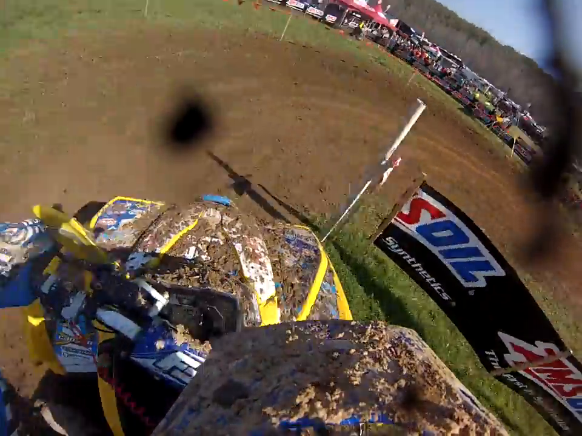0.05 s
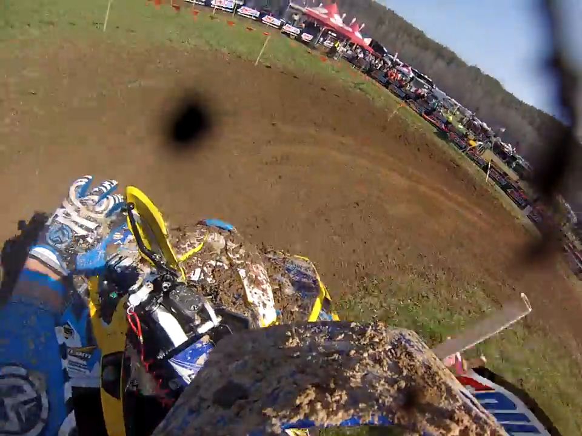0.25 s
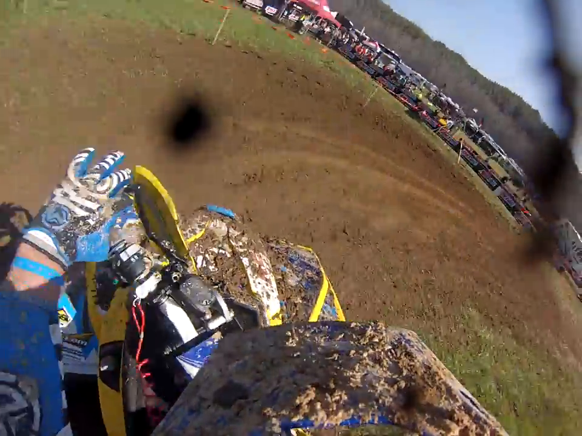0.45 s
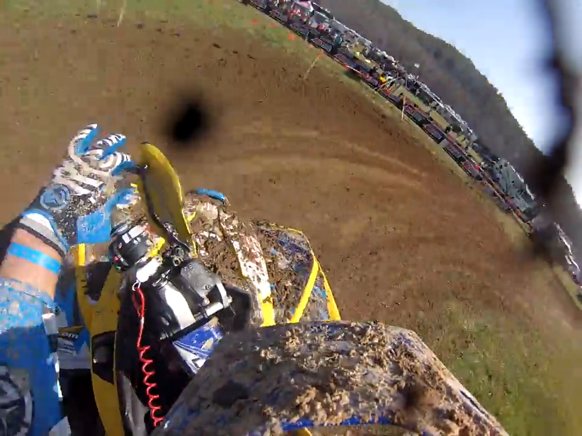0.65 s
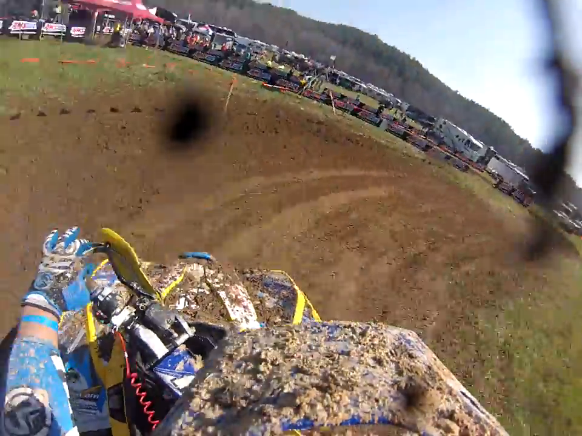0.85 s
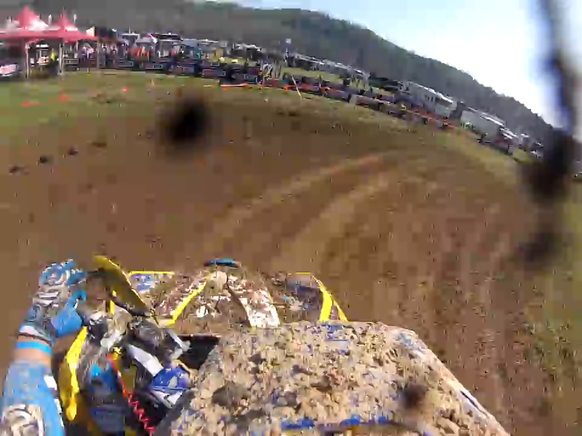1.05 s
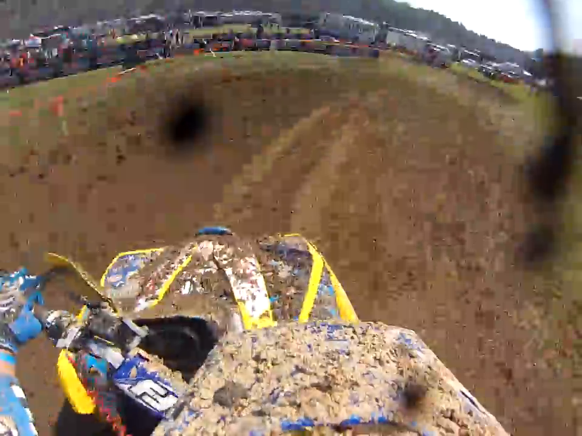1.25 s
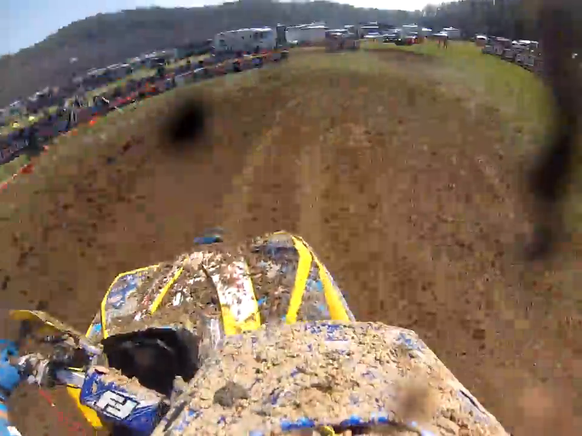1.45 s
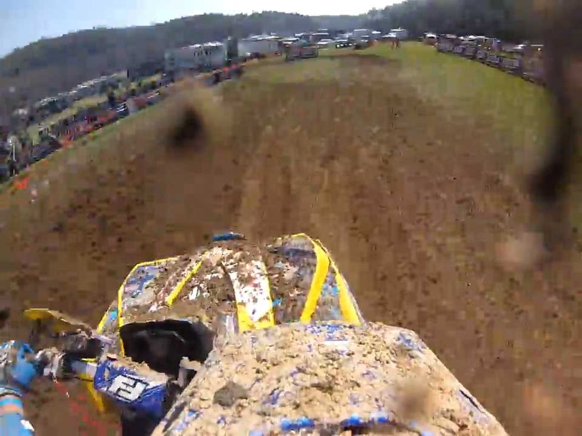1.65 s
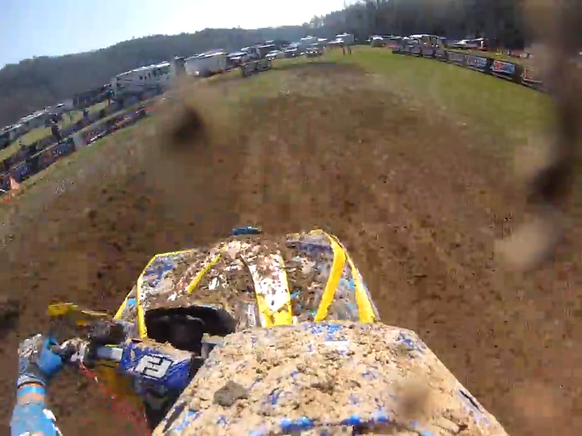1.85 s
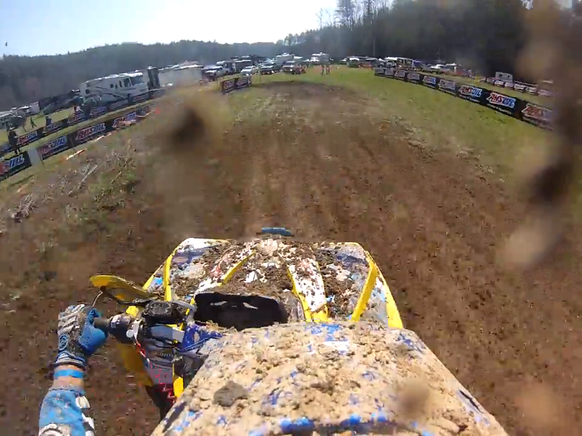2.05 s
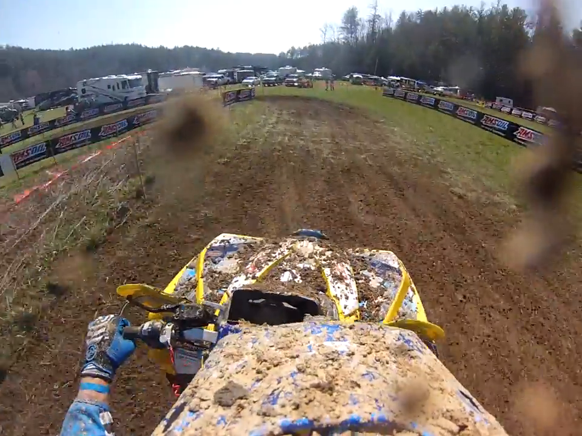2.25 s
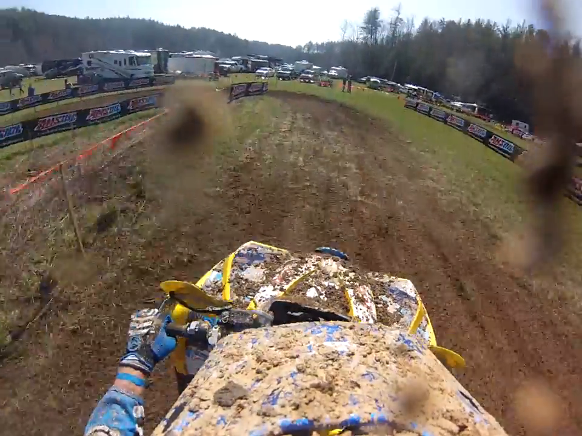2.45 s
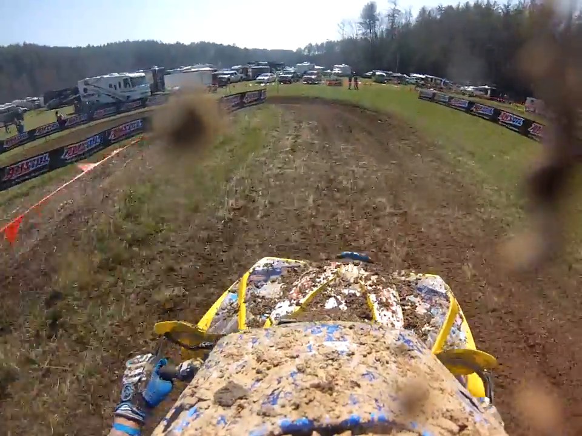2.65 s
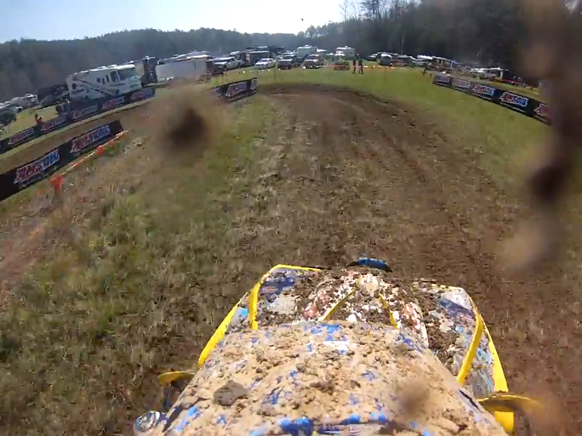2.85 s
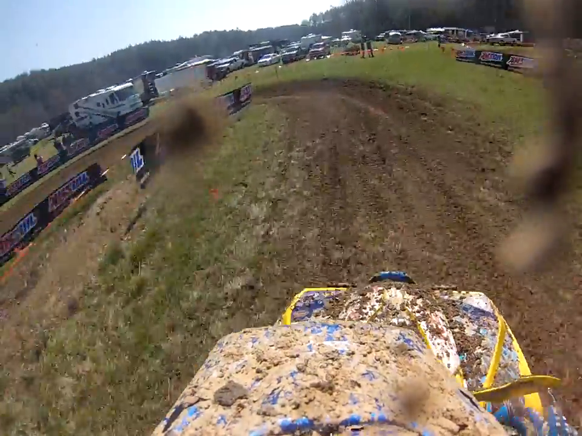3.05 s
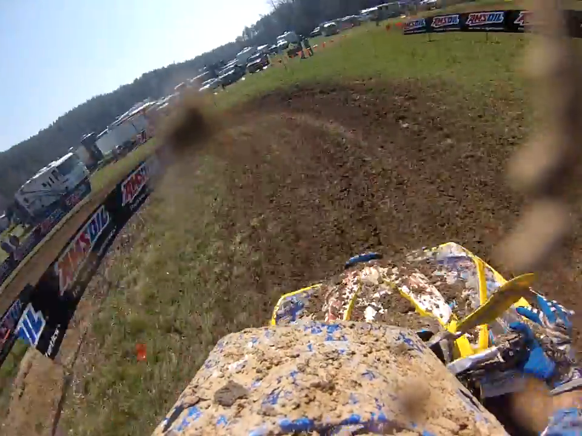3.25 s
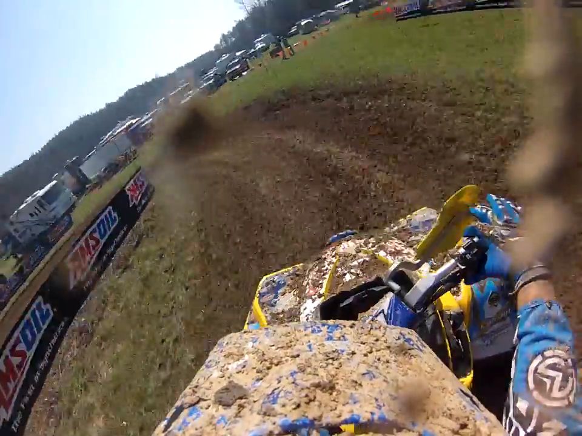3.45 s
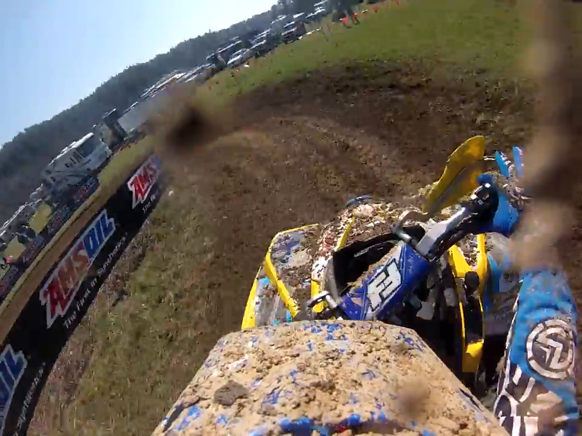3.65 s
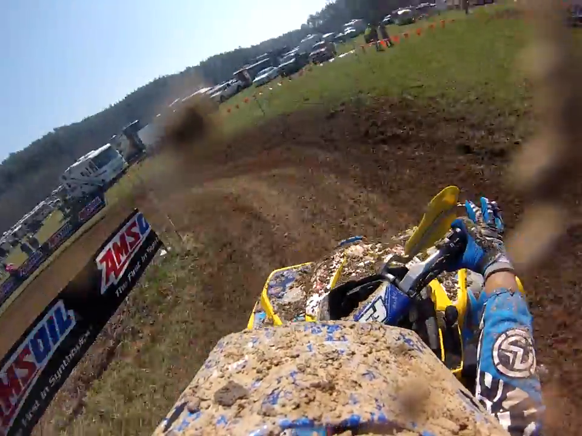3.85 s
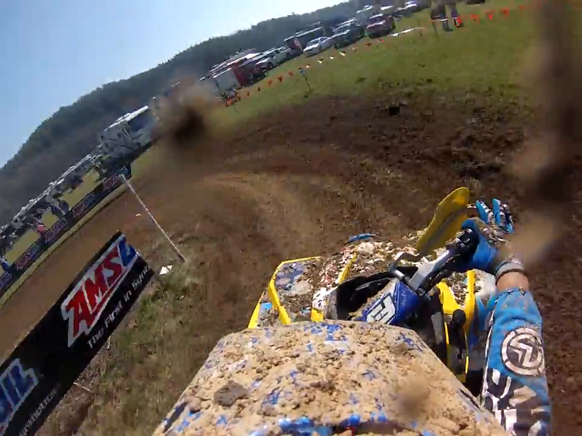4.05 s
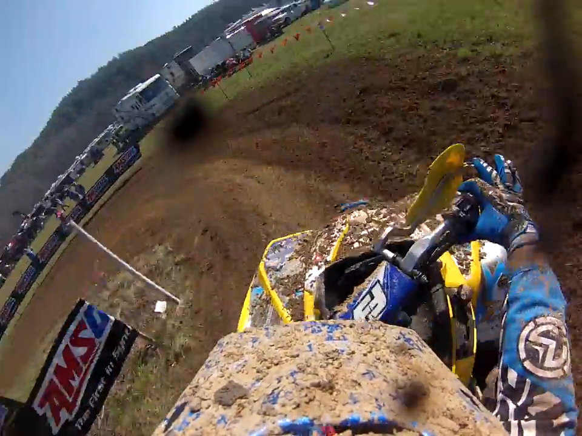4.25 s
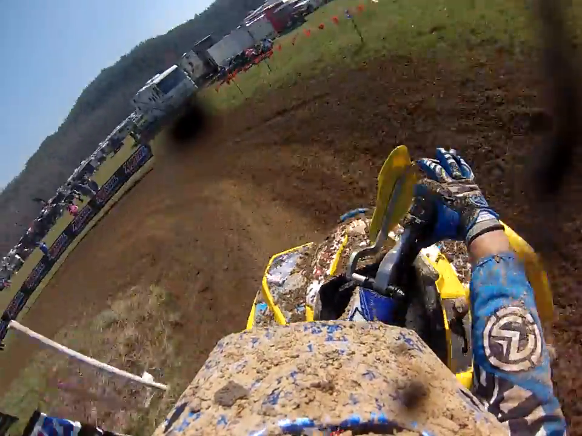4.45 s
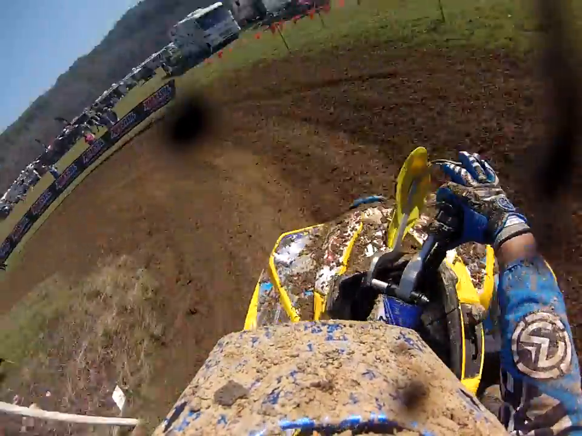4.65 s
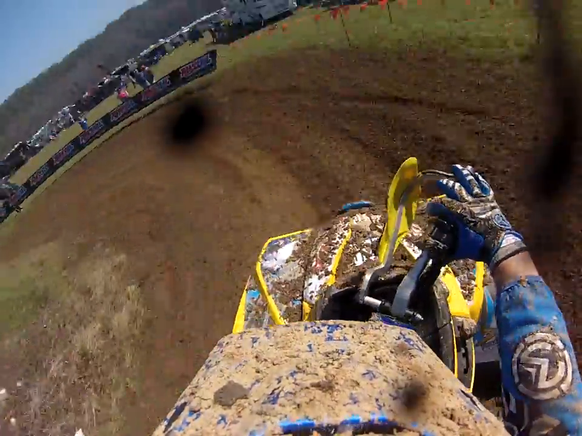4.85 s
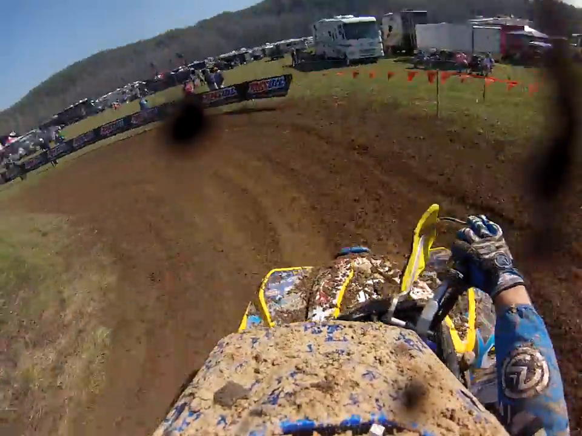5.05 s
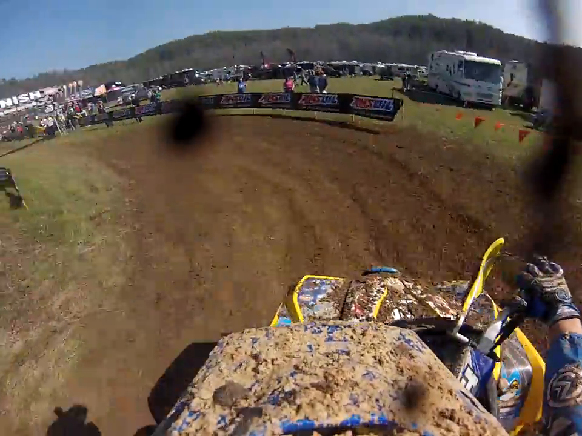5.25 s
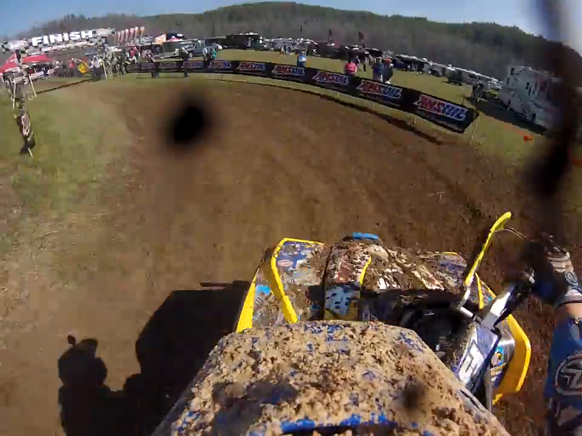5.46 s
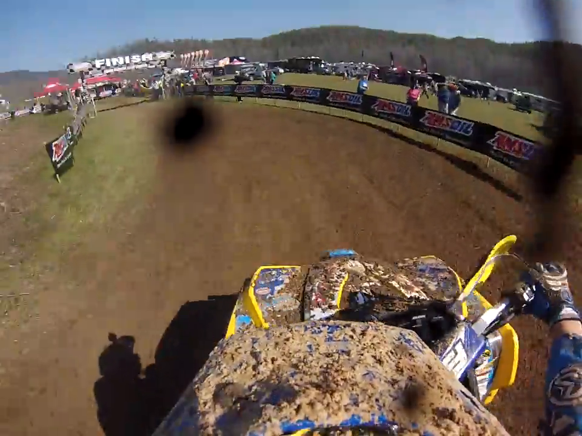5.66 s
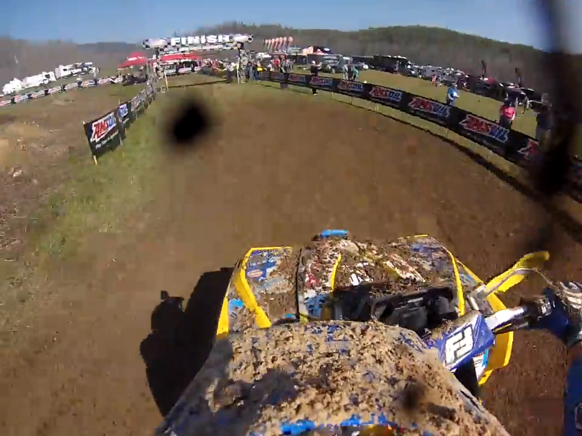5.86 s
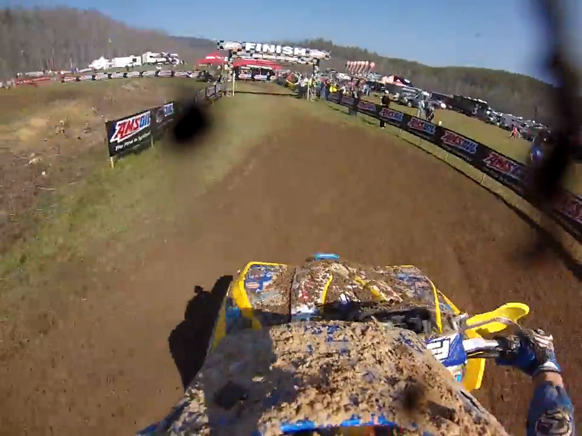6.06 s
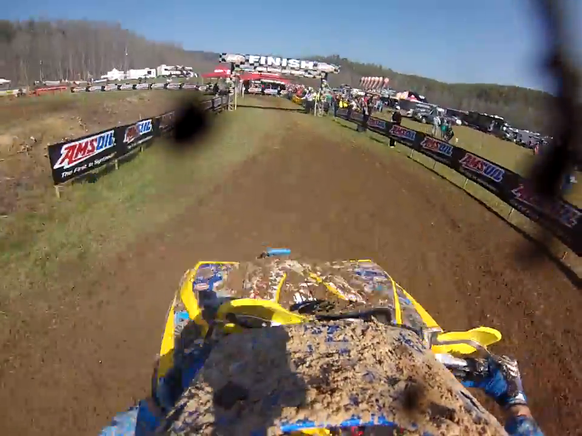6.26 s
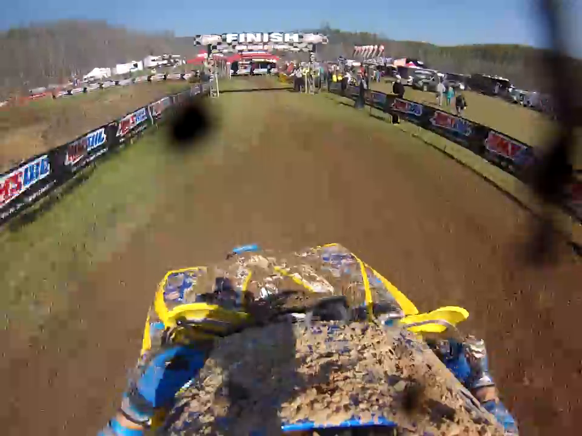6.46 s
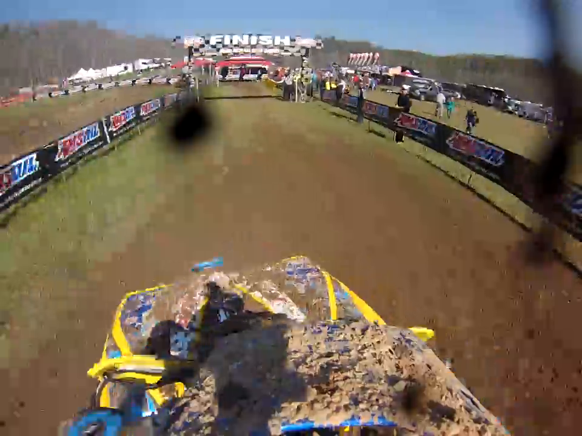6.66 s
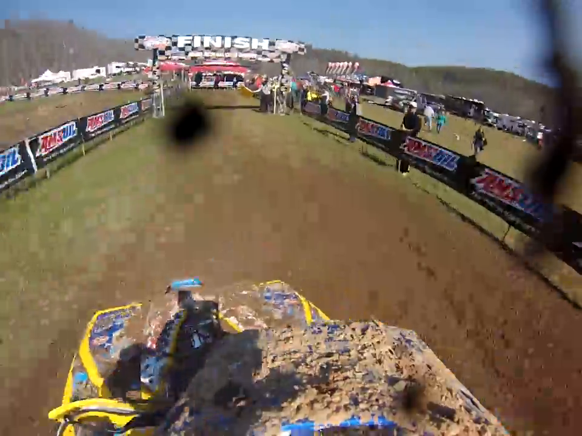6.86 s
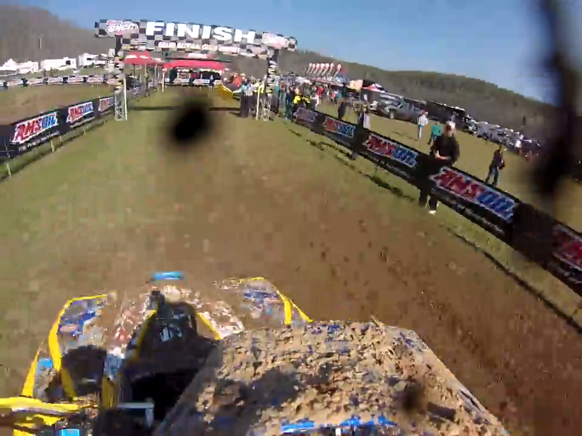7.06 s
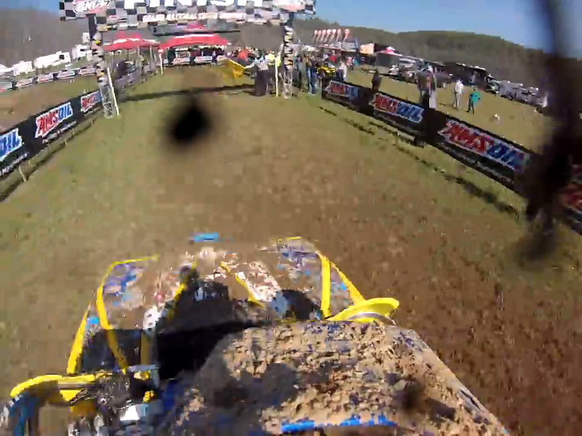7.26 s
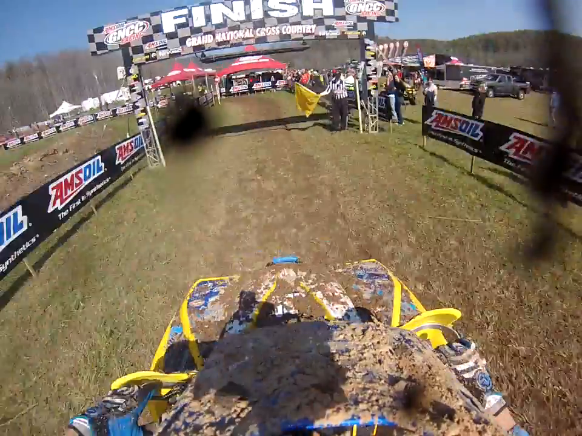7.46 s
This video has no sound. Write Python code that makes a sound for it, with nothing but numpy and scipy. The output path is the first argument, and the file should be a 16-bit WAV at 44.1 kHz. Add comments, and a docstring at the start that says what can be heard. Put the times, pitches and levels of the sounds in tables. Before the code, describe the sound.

A racing quad's single-cylinder four-stroke engine is heard close, from the rider's helmet on an outdoor dirt track. It sags for a moment, then the throttle opens at about 0.3 seconds and it climbs to full revs by 1.7, holding with a hard, honking rasp. At 2.8 seconds the throttle shuts and the engine burbles down almost to idle. A loose metal part chatters lightly from 4 to 4.4 seconds. At 4.6 the engine barks and climbs again, reaching full revs around 6 seconds and turning into a snarl with a metallic buzz that lasts until the end, at about 7.5. Low wind gusts come and go over faint tyre and chain noise. Dull chassis thuds land at the start, between 1 and 2 seconds, near 3, and several times from 4.5 to 6. Dirt occasionally ticks on the helmet, most clearly around 6.6 seconds.

```python
"""A race quad, heard from the rider's helmet, pulls to full revs on dirt, shuts off, rattles through
a turn near idle and pulls up again. Firings of its single-cylinder four-stroke ring the silencer,
pipe and airbox; gas rasps once a cycle, and metal buzzes as the second pull turns to a snarl.
Around it: wind gusts, tyre and chain noise, chassis jolts and clods ticking on the helmet."""
import sys
import numpy as np
from scipy import signal
from scipy.fft import rfft, irfft
from scipy.io import wavfile
from scipy.ndimage import uniform_filter1d

SR = 44100
rng = np.random.default_rng(int(sys.argv[2]) if len(sys.argv) > 2 else 0)


def transcribe(signal):
    """Save signal, clipped to [-1, 1], as a 16-bit WAV file at the path in sys.argv[1]."""
    frames = np.atleast_2d(signal).T
    limited = np.clip(frames, -1, 1)
    pcm = np.round(limited * 32767).astype(np.int16)
    wavfile.write(sys.argv[1], SR, pcm)


N = 330750
T = np.arange(N) / SR
FREQS_HZ = np.maximum(np.arange(8193) * SR / 16384, 1)
FULL_HZ = 66  # firing rate flat out
SECOND_PULL = T > 4  # from the slow turn on

# Chassis jolts. Each row: start in seconds, relative thud level in dB, pitch in Hz, decay in seconds,
# level change after the jolt in dB.
JOLTS = [(0.117, -1.5, 36, 0.03, -10), (.63, -25.5, 36, 0.027, -1), (1.179, -13, 36.4, 0.035, -4.5),
         (1.445, -7, 36, .03, -3), (1.715, -9, 36, .03, -1), (2.977, -10, 45, 0.016, -3.5),
         (4.56, -12, 36.2, 0.049, 1), (4.995, -4.5, 44.6, 0.072, -10), (5.541, -7, 36, .03, -3.5),
         (6.095, -8, 27, .04, -1), (6.64, -29, 36, .03, 0.5)]


def undb(db):
    """Decibels to gain."""
    return 10 ** (np.asarray(db) / 20)


def curves(table):
    """One control signal per column after the time column."""
    times_s, *columns = np.transpose(table)
    return [np.interp(T, times_s, column) for column in columns]


def unit(x):
    """Scale to rms 1."""
    return x / np.sqrt(np.mean(x ** 2))


def steady(x, size=4000):
    """Hold the running rms at 1; single cycles keep their shape."""
    power = uniform_filter1d(uniform_filter1d(x ** 2, size), size)
    return x / np.sqrt(np.abs(power) + 1e-12)


def walk(rate_hz):
    """Smooth random wander, rms 1."""
    hold = int(SR / rate_hz)
    steps = np.repeat(rng.standard_normal(N // hold + 1), hold)
    return unit(uniform_filter1d(steps, hold)[:N])


def swell(start_s, length_s, edge_s):
    """Trapezoid envelope, at 1 from start_s for length_s."""
    end_s = start_s + length_s
    return np.interp(T, [start_s - edge_s, start_s, end_s, end_s + edge_s], [0, 1, 1, 0])


def burst(start_s, decay_s, rise_s):
    """Envelope of a blow, peak 1."""
    age_s = np.maximum(T - start_s, 0)
    shape = (1 - np.exp(-age_s / rise_s)) * np.exp(-np.minimum(age_s / decay_s, 20))
    return shape / shape.max()


def ring(x, gain, size=8192):
    """Minimum-phase filter with the given gain at FREQS_HZ."""
    cepstrum = irfft(np.log(gain + 1e-5))
    cepstrum[1:size] *= 2
    cepstrum[size + 1:] = 0
    impulse = irfft(np.exp(rfft(cepstrum)))[:size]
    return signal.fftconvolve(x, impulse)[:N]


def colour(x, points):
    """Filter by a spectrum of (Hz, dB) points."""
    hz, db = np.transpose(points)
    return ring(x, undb(np.interp(np.log(FREQS_HZ), np.log(hz), db)))


def cavity(x, modes):
    """Ring steep (Hz, width Hz, dB) resonances; running rms 1."""
    hz, width_hz, db = np.transpose(modes)
    detuning = (FREQS_HZ[:, None] / hz - hz / FREQS_HZ[:, None]) * hz / width_hz
    return steady(ring(x, 1 / (1 + detuning ** 2) @ undb(db)))


def rolling():
    """Tyres, chain and valve gear: a faint, wavering noise."""
    spectrum = [(150, -16.5), (400, 5), (950, -16.5), (1450, 2), (1900, -5), (8000, -38), (15000, -42)]
    return unit(colour(rng.standard_normal(N), spectrum)) * undb(-42.5 + 2 * walk(7))


def wind(breeze_db=-30):
    """Air buffets the helmet in gusts over a steady breeze."""
    # Buffet spectrum. Each row: frequency in Hz, density in dB.
    spectrum = [(10, -18), (24, -7), (31, -4), (39, 0), (52, -13), (100, -22), (300, -40), (1000, -66),
                (6000, -100)]
    # Each row: start in seconds, length in seconds, level in dB.
    gusts = [(0.247, 0.49, -18.5), (1.134, 0.35, -19.5), (2.742, 0.19, -20.5), (2.968, 0.42, -18),
             (3.565, 0.23, -17.5), (4.02, 0.33, -26), (4.58, 0.18, -16), (5.28, .3, -24), (6.86, 0.44, -25)]
    gusting = np.max([undb(db) * swell(s, length_s, edge_s=.12) for s, length_s, db in gusts], axis=0)
    return steady(colour(rng.standard_normal(N), spectrum)) * np.maximum(gusting, undb(breeze_db))


def chatter():
    """A loose part rings and scrapes near idle."""
    # Each row: start in seconds, relative level in dB, ring in Hz.
    hits = [(4.0093, -29.5, 2420), (4.071, -28, 2440), (4.0981, -29, 2500), (4.1235, -31, 2170),
            (4.226, -23, 2400), (4.2527, -25, 2050), (4.2797, -24, 2500), (4.3047, -22.5, 2380),
            (4.3301, -25, 2060), (4.354, -22.5, 2540)]
    spectrum = [(1200, -4), (2300, 14), (3400, -5), (4600, -16), (5700, -11), (7500, -41.5)]
    scrape = unit(colour(rng.standard_normal(N), spectrum))
    out = np.zeros(N)
    for start_s, db, hz in hits:
        clink = .55 * np.sin(2 * np.pi * hz * T) + .7 * scrape
        out += undb(db - 4) * burst(start_s, decay_s=.003, rise_s=.003) * clink
    return out


def clods():
    """Dirt ticks on the helmet."""
    # Each row: start in seconds, relative level in dB.
    hits = [(0.748, -25), (0.935, -24), (2.9844, -43), (3.3343, -40), (3.5109, -30), (4.595, -32),
            (4.7594, -48), (4.898, -23), (4.971, -24), (6.6454, -13)]
    grit = unit(colour(rng.standard_normal(N), [(800, -12), (2500, 12), (6000, -1), (15000, -18)]))
    return grit * sum(undb(db - 5.5) * burst(s, decay_s=.0012, rise_s=.00028) for s, db in hits)


def thuds():
    """Jolts ring the chassis as low damped sines."""
    return -sum(undb(db - 3) * burst(s, decay_s, rise_s=.00047) * np.sin(2 * np.pi * hz * (T - s))
                for s, db, hz, decay_s, _ in JOLTS)


def jolt_dips(lag_s=.006, fall_s=.008, recovery_s=.18):
    """Gain that dips briefly after most jolts."""
    corners_s = np.cumsum([lag_s, fall_s, recovery_s])
    return undb(sum(np.interp(T - s, corners_s, [0, db, 0]) for s, *_, db in JOLTS))


def firings(hz, throttle):
    """Cycle phase and firing strength; both scatter at low revs, strength also with throttle."""
    slowness = 1 - hz / hz.max()
    cycles = np.cumsum(hz) / SR
    draws = rng.standard_normal((int(cycles[-1]) + 2, 2))
    scatter, jitter = (np.interp(cycles, np.arange(len(draw)), draw) for draw in draws.T)
    phase = (cycles + jitter * (.001 + .004 * slowness)) % 1
    return phase, undb(scatter * (throttle + 1.6 * slowness))


def pressure(hz, throttle, phase, spread_rad=.99, count=44):
    """Intake and exhaust waves; under load the pipe favours certain orders."""
    # Engine orders from 1 up. Each row: dB on the first climb, then flat out, second climb, then flat out.
    order_db = [(-12, 1.5, -11, 3), (-0.5, 1, 2.5, 3), (-1, 1, 3.5, 4), (-5.5, -3.5, 1.5, -3),
                (-3, 2, -8, -1), (1.5, 2, 0.5, 6.5), (-8, -9, -38, 2.5), (3, -0.5, 13, -3.5),
                (0, -0.5, 2.5, 4), (-3, -3.5, 1.5, -4.5), (1.5, -9, 5, 2.5), (-11, 0, 1, 5),
                (-7, -9.5, 6.5, -2), (2.5, -2, 3, 3.5), (-6, 0, -21, 9), (-1.5, -9, 10.5, -4),
                (2.5, -22, 1, -4.5), (1, -4, 5.5, 4), (-5, -14, 8.5, 0.5), (-2, -4.5, 10.5, -6),
                (3, -4.5, 4, -1.5), (-12, -8.5, 1, -2.5), (6, -11, 4.5, -5.5), (2, -24, 4.5, -6)]
    flat_out = np.interp(hz, [59, 64], [0, 1])
    climbing = np.interp(hz, [32, 47], [0, 1]) * (1 - flat_out)
    shares = throttle * np.array([state * pull for pull in (~SECOND_PULL, SECOND_PULL)
                                  for state in (climbing, flat_out)])
    grid = np.linspace(0, 1, 2049)
    orders = np.arange(1, count + 1)[:, None]
    partials = np.cos(2 * np.pi * orders * grid + spread_rad * rng.standard_normal((count, 1)))
    wave = (1 - shares.sum(0)) * np.interp(phase, grid, partials.sum(0))
    for share, db in zip(shares, np.transpose(order_db)):
        cycle = undb(np.pad(db, (0, count - len(db)))) @ partials
        wave += share * np.interp(phase, grid, cycle)
    return wave * 2 * np.sqrt(hz / SR)  # 0 dB orders match unit noise in power per Hz


def ground_echo(x):
    """Add a ground bounce; bumps vary its path, so upper orders waver."""
    lag_s = .005 + .0003 * walk(4)
    return x + .36 * np.interp(T - lag_s, T, x)


def metal_buzz(gas, phase, decay_cycles=.62):
    """Loose metal rings after each firing, loudest late in the second pull."""
    # Each row: frequency in Hz, width in Hz, level in dB.
    modes = [(3270, 980, 8), (5010, 180, 0.5), (6400, 550, -9), (7510, 380, -6)]
    # Each row: time in seconds, level in dB.
    levels = [(0, -68.5), (5.2, -65), (5.8, -46), (6.3, -33), (6.8, -33.5), (7.35, -41), (7.5, -60)]
    return cavity(gas * np.exp(-phase / decay_cycles), modes) * undb(curves(levels)[0] + 2.7 * walk(30))


def gas_rasp(waves, gas, overrun_db, snarl_db):
    """Gas rasps through the valve and flickers more in the snarl."""
    # Each row: frequency in Hz, density in dB.
    spectrum = [(1000, -9.5), (1800, -9.5), (2150, 2), (2450, -4), (2700, -13), (3100, -9), (3900, -14),
                (4350, -19.5), (5050, -14.5), (5800, -24), (7600, -28.5), (8600, -32), (11500, -36),
                (15000, -48.5)]
    flicker_db = (.68 + 1.4 * np.clip(snarl_db, 0, 1)) * walk(25)
    return steady(colour(gas + undb(-.5 - overrun_db) * waves, spectrum)) * undb(flicker_db)


def airbox_honk(waves, gas, overrun_db, snarl_db, singing_width_hz=96):
    """Waves and turbulence ring the airbox; at times one resonance sings out."""
    # Each row: frequency in Hz, width in Hz, level in dB.
    modes = [(1130.4, 152, -4.5), (1275, 17.4, -1), (1407.5, 101, 2), (1543, 130, -5.5)]
    # Each row: start in seconds, length in seconds, level against the honk in dB, frequency in Hz.
    notes = [(2.14, 0.68, -1.5, 1396), (4.96, .02, 1, 1437), (5.616, 0.1, -1, 1410),
             (5.65, 0.74, -4.5, 1163)]
    air = waves + undb(-9 + 1.4 * (overrun_db + snarl_db)) * gas
    singing = sum(undb(db) * swell(s, length_s, edge_s=.072) * cavity(air, [(hz, singing_width_hz, 0)])
                  for s, length_s, db, hz in notes)
    return (cavity(air, modes) + singing) * undb(1.05 * walk(14))


def pipe_bark(waves, gas, turbulence_db):
    """The exhaust pipe rings, harder as the throttle snaps open."""
    # Each row: frequency in Hz, width in Hz, level in dB.
    modes = [(317, 17.6, 3), (395.7, 45, 2.5), (471, 98, 1.5), (567.6, 36, 0), (680, 44, -7.5),
             (790, 98, -8), (933, 180, -9.5)]
    # Sag in the second pull. Each row: time in seconds, gain in dB.
    sag = [(5.45, 0), (5.6, -5.5), (6.3, -3), (7.2, 0.5)]
    # Each row: start in seconds, length in seconds, boost in dB.
    snaps = [(.35, .14, 2), (1.09, .07, 2), (4.66, 0.061, 4)]
    snap_db = sum(db * swell(s, length_s, edge_s=.029) for s, length_s, db in snaps)
    return cavity(waves + undb(-16 + turbulence_db) * gas, modes) * undb(curves(sag)[0] + snap_db)


def silencer_boom(waves, gas, throttle, overrun_db):
    """Exhaust puffs ring the silencer, which burbles under engine braking."""
    # Throttle open, then shut. Each row: frequency in Hz, width in Hz, level in dB.
    open_modes = [(77, 57.5, 5), (154.7, 80, 1), (259, 51, -3.5)]
    shut_modes = [(76, 12, 7), (143, 54, 0), (230, 50, -21), (375, 60, -24)]
    puffs = waves + undb(-19 + overrun_db / 2) * gas
    boom = throttle * cavity(puffs, open_modes) + (1 - throttle) * cavity(puffs, shut_modes)
    braking_db = 2.8 * swell(start_s=2.97, length_s=.59, edge_s=.12)
    return steady(boom) * undb(braking_db)


def engine():
    """Firings and turbulent gas drive five voices that follow speed and throttle."""
    # Each row: time in seconds, firing rate in Hz.
    speeds = [(0.0, 43.8), (0.31, 33.7), (0.38, 33.9), (0.5, 38.4), (0.69, 41.5), (1.0, 43.8), (1.11, 49.2),
              (1.23, 53.4), (1.69, 64.2), (1.86, 65.2), (2.57, 67.1), (2.82, 65.4), (2.9, 55.9),
              (3.11, 44.8), (3.28, 40.6), (3.49, 38.7), (3.86, 28.5), (4.11, 25.5), (4.58, 25.4),
              (4.6, 26.3), (4.7, 36.0), (4.78, 38.7), (5.3, 54.1), (5.49, 59.1), (5.7, 62.0), (5.95, 65.0),
              (6.43, 66.2), (6.95, 64.5), (7.42, 66.4), (7.5, 65.6)]
    # Each row: time in seconds, throttle opening 0-1.
    openings = [(0, 0), (.27, 0), (.35, 0.71), (1.1, 1), (2.79, 0.91), (2.85, 0.17), (4.55, 0.02),
                (4.7, 0.5), (5.2, 1), (7.5, 0.85)]
    # Extra turbulence. Each row: time in seconds, dB before each voice's weighting.
    snarl = [(0, 0), (1.7, 0), (2.1, -3), (2.8, -3), (3, 0), (5.3, 0), (5.6, -2), (6.3, -2), (6.5, 4),
             (7.5, 3)]
    hz, throttle, snarl_db = curves(speeds) + curves(openings) + curves(snarl)
    overrun_db = 11 * (1 - throttle) ** 2  # more turbulence off throttle
    lugging_db = 6.5 * throttle * np.log2(FULL_HZ / hz)  # and under load at low revs

    def gain(full_db, octave_db, shut_db, second_pull_db, snarl_share):
        """Level of one voice against speed, throttle and snarl."""
        return undb(full_db + octave_db * np.log2(hz / FULL_HZ) + shut_db * (1 - throttle)
                    + second_pull_db * throttle * SECOND_PULL + snarl_share * snarl_db)

    phase, strength = firings(hz, throttle)
    waves = strength * pressure(hz, throttle, phase)
    echoed = ground_echo(waves)
    valve_flow = strength * (.24 + (.5 + .5 * throttle) * np.exp(-phase / 1.07))
    gas = [steady(valve_flow * rng.standard_normal(N)) for _ in range(5)]
    boom = silencer_boom(waves, gas[0], throttle, overrun_db)
    boom *= gain(full_db=-18, octave_db=2.5, shut_db=-4, second_pull_db=1.3, snarl_share=-.04)
    bark = pipe_bark(echoed, gas[1], overrun_db + lugging_db + snarl_db / 2)
    bark *= gain(full_db=-17, octave_db=11, shut_db=-15, second_pull_db=-.5, snarl_share=0)
    honk = airbox_honk(echoed, gas[2], overrun_db, snarl_db)
    honk *= gain(full_db=-21, octave_db=13.5, shut_db=-9, second_pull_db=3, snarl_share=.03)
    rasp = gas_rasp(echoed, gas[3], overrun_db, snarl_db)
    rasp *= gain(full_db=-24, octave_db=13.5, shut_db=-8.5, second_pull_db=1.65, snarl_share=.5)
    return boom + bark + honk + rasp + metal_buzz(gas[4], phase)


def scene():
    """Mono mix: engine and ride noise dip under the jolts; knocks sit on top."""
    ride = (engine() + wind() + rolling()) * jolt_dips()
    return (ride + thuds() + chatter() + clods())[None]


def record(dry, top_hz=15400):
    """Round the highest peaks and cut the top."""
    lowpass = signal.ellip(8, .2, 80, top_hz, fs=SR, output="sos")
    return signal.sosfilt(lowpass, np.tanh(.5 * dry) / .5)


dry = scene()
out = record(dry)
transcribe(out)
```